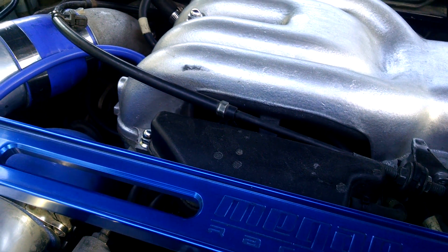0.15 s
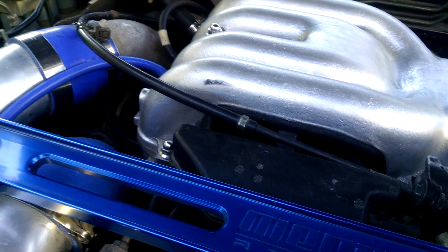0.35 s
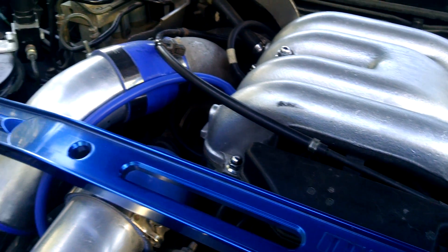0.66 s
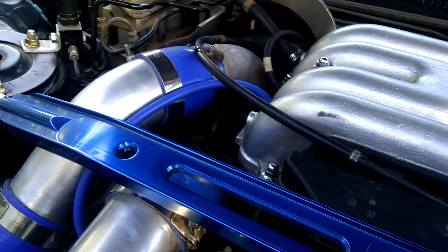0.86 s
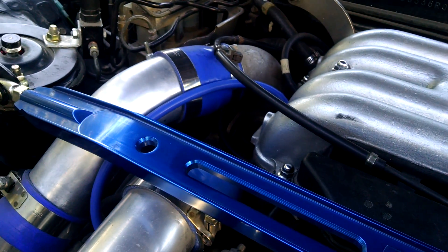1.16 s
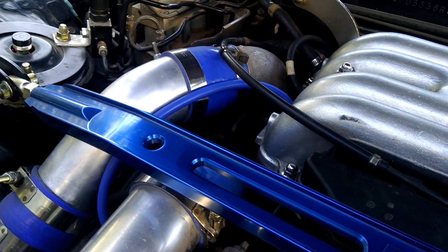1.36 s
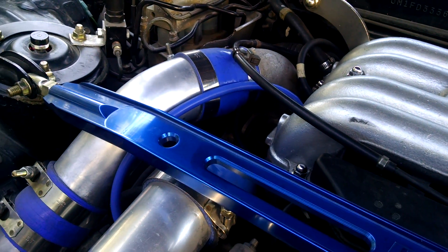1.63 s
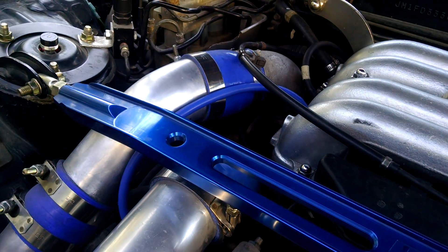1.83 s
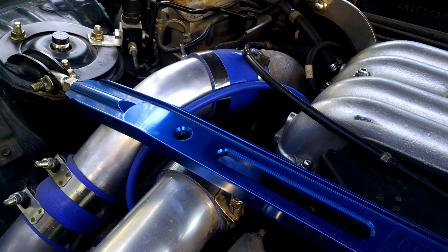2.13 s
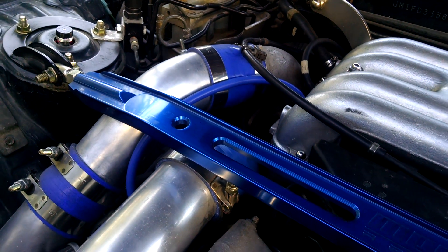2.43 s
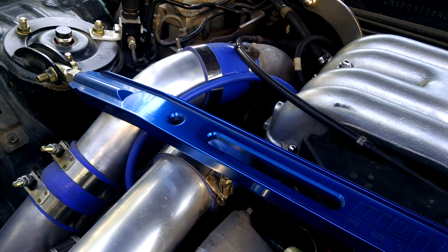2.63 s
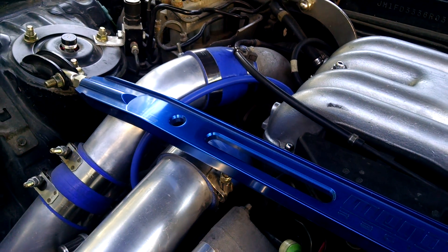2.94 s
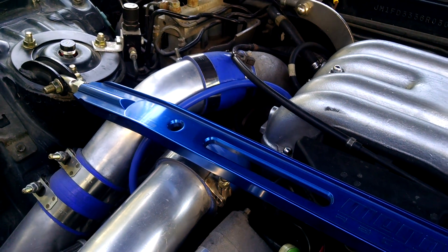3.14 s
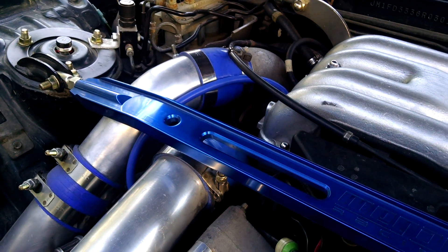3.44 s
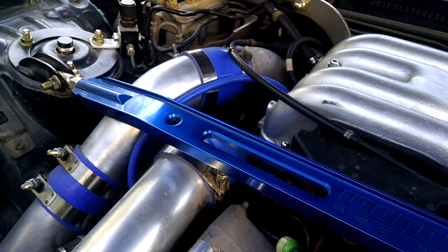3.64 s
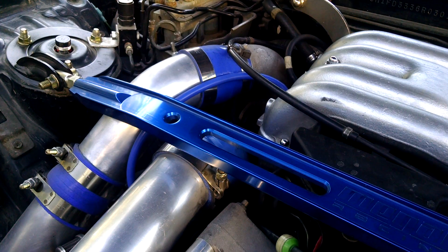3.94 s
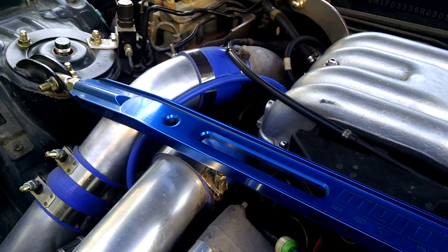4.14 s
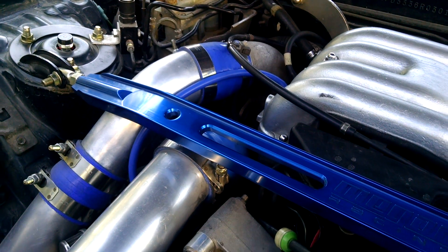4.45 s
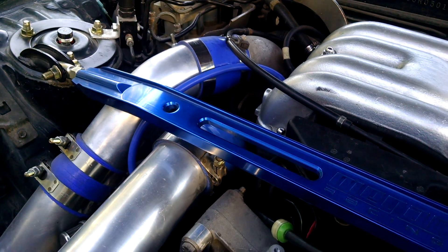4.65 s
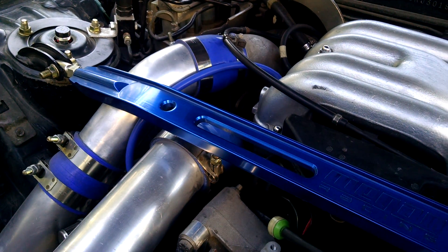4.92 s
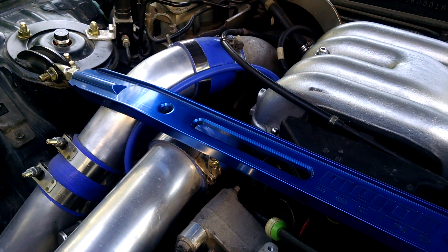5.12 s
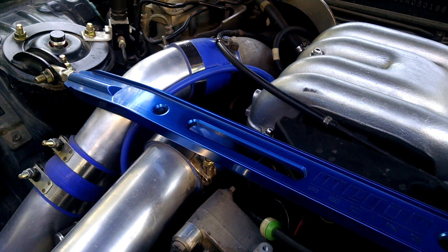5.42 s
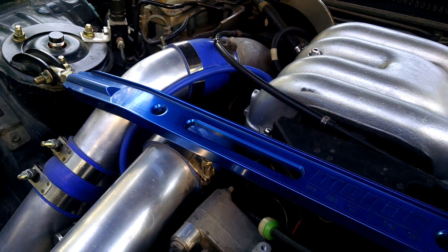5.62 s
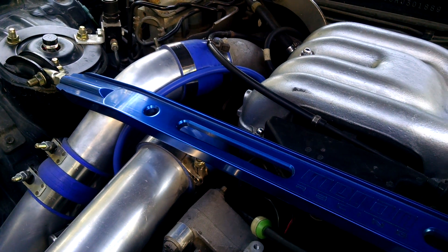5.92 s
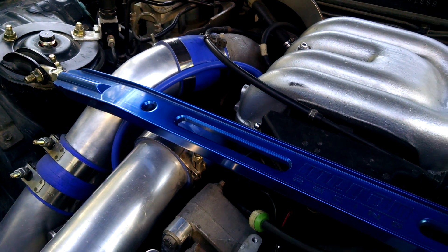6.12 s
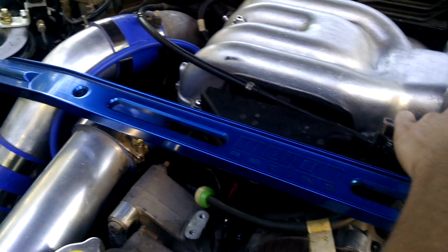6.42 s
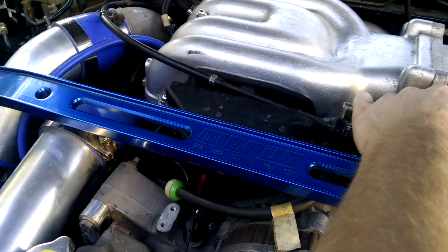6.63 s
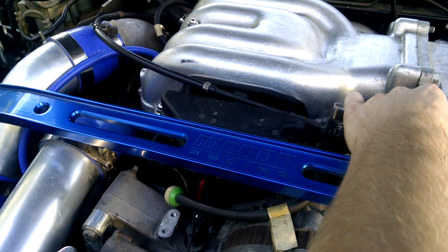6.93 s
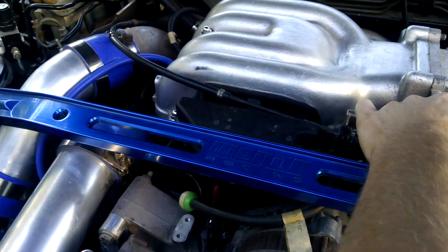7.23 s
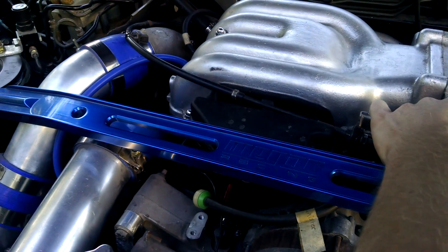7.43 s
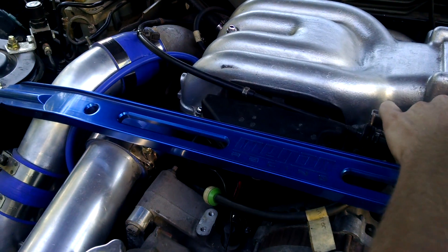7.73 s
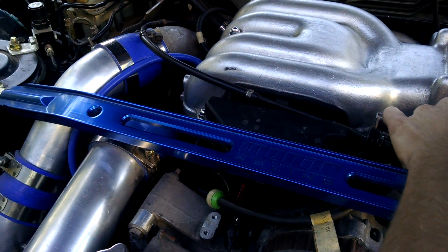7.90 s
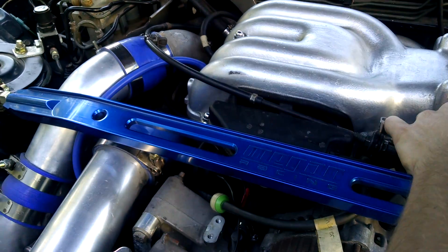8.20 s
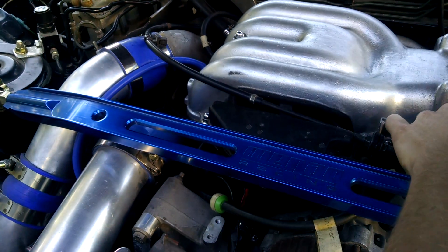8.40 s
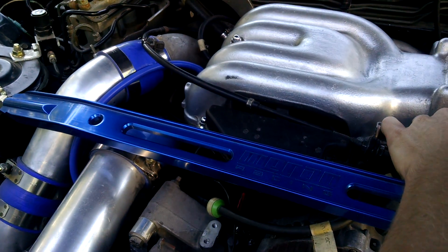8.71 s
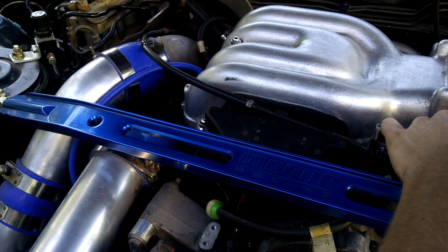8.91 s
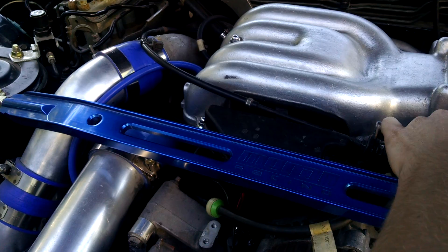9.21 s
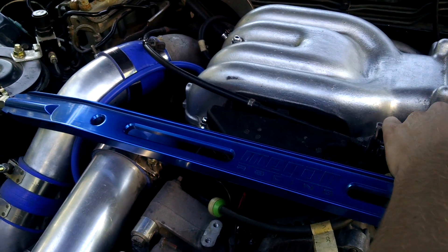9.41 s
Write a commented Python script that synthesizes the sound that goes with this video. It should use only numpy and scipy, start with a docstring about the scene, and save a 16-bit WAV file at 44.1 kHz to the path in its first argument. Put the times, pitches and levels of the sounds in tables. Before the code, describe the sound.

Heard very close under an open hood, a twin-rotor engine is already running. From 0 to 3 seconds it holds a fast idle, rising slightly at first: rapid even firing, low exhaust boom, nasal intake drone, dry clatter, spinning hiss and thin belt and gear whine. A narrow airy whistle catches at times. Around 3.1 the throttle eases and pitch sags in uneven steps until about 4, with dull misfire thumps. It recovers to a gentle drone by 4.8, then climbs from 5.5 to a moderate peak near 6.4, whine and whistle rising. The throttle shuts around 6.5; the pitch tumbles to a deep, lumpy putter by 7.5, with brief booming catches and soft thuds. It stays low until 8.2, revs smoothly to about 9.1, then drops roughly, still running at 9.5. Brighter sounds lean right; faint low air buffeting lies underneath.

```python
"""Under an open hood, a twin-rotor engine holds a fast idle, then rises and falls as a hand works the throttle.
Its rotors fire in turn: pulse trains boom through an exhaust duct, drone in the intake and knock the housings.
A shut throttle scatters the firings into a lumpy putter; misfires thump in the exhaust.
Shaft-locked noise and sines make the clatter, hiss and gear whine; narrow noise bands make the air whistle.
A close stereo pickup with comb-like cancellations listens."""
import sys
import numpy as np
from scipy import signal
from scipy.fft import rfft, irfft, next_fast_len
from scipy.io import wavfile
from scipy.ndimage import uniform_filter1d, map_coordinates

SR = 44100
rng = np.random.default_rng(int(sys.argv[2]) if len(sys.argv) > 2 else 0)


def store_wav(level_fs):
    """Save 16-bit WAV to argv[1]."""
    pcm = np.round(np.clip(np.atleast_2d(level_fs), -1, 1) * 32767)
    wavfile.write(sys.argv[1], SR, pcm.T.astype(np.int16))


N = 421596


def amp(db):
    """Decibels to gain."""
    return 10 ** (np.asarray(db) / 20)


def unit(x):
    """Scale to rms 1."""
    return x / np.sqrt(np.mean(x ** 2) + 1e-20)


def along(points, hz):
    """Interpolate (frequency [Hz], value) points on a log frequency axis."""
    f, v = np.transpose(points)
    return np.interp(np.log(hz + 1), np.log(f + 1), v)


def curves(rows):
    """One value per sample for each column after the time."""
    s, *cols = np.transpose(rows)
    return [np.interp(np.arange(N) / SR, s, c) for c in cols]


def wobble(rate_hz, order=12):
    """Smooth random curve: rate_hz knots a second, order spline points per knot."""
    knots = rng.standard_normal(int(N * rate_hz / SR) + 4)
    grid = np.arange((len(knots) - 1) * order) / order
    return np.interp(np.arange(N) * rate_hz / SR, grid, map_coordinates(knots, [grid]))


def gate(start_s, end_s, rise_s, fall_s):
    """Rise, hold at 1 and fall, each ramp centred on its time."""
    t = np.arange(N) / SR
    return np.clip(np.minimum((t - start_s) / rise_s, (end_s - t) / fall_s) + .5, 0, 1)


def filtered(x, response):
    """Multiply the spectrum of x by a response of frequency."""
    m = next_fast_len(N + SR // 2)
    return irfft(rfft(x, m) * response(np.fft.rfftfreq(m, 1 / SR)), m)[..., :N]


def resonance(hz, centre_hz, width_hz):
    """Response of one damped mode, 1 at its centre."""
    return 1j * hz * width_hz / (centre_hz ** 2 - hz ** 2 + 1j * hz * width_hz)


def duct(x, colour, size=16384):
    """Ring x causally through a minimum-phase duct of the given colour."""
    cepstrum = irfft(np.log(amp(along(colour, np.fft.rfftfreq(size, 1 / SR)))))
    cepstrum[1:size // 2] *= 2
    cepstrum[size // 2 + 1:] = 0
    impulse_response = irfft(np.exp(rfft(cepstrum)))[:size // 2]
    return signal.fftconvolve(x, impulse_response)[:N]


def steady(x, size=3000):
    """Hold the running rms near 1."""
    power = uniform_filter1d(uniform_filter1d(x ** 2, size), size)
    return x / np.sqrt(np.abs(power) + 1e-14)


def from_right(x, lag_s):
    """Sound from the right reaches the left port lag_s later than the right."""
    return filtered(x, lambda hz: np.exp(1j * np.pi * lag_s * np.outer([-1, 1], hz)))


# correlation of the two ports: (frequency [Hz], correlation [-1 to 1])
PORT_CORRELATION = [(30, -0.5), (70, 0), (300, 0.5), (1000, 0.64), (1700, -0.5), (2300, -0.65),
                    (3200, -0.5), (5200, -0.2), (6500, 0), (9000, 0.2), (15000, 0.2)]


def rush(colour, pair=None):
    """Two noises (white unless given), coloured and blended into the two ports at rms 1."""
    def response(hz):
        turn = np.arccos(np.clip(along(PORT_CORRELATION, hz), -1, 1)) / 2
        return amp(along(colour, hz)) * [np.cos(turn), np.sin(turn)]
    noises = rng.standard_normal((2, N)) if pair is None else pair
    mid, side = filtered(noises, response)
    return unit(np.array([mid + side, mid - side]))


# eccentric shaft: (time [s], speed [turns/s])
SHAFT_SPEED = [(0, 30.1), (.3, 31.4), (.6, 32.2), (1.3, 33), (1.8, 32.9), (2, 32.55), (3.12, 32.55),
               (3.3, 30.2), (3.39, 27.8), (3.5, 28.8), (3.62, 25.2), (3.8, 25.1), (3.95, 23.2),
               (4.08, 23.1), (4.3, 25.1), (4.68, 28), (4.88, 28.6), (5.1, 28.15), (5.45, 28.3), (5.7, 30.4),
               (6.15, 37), (6.42, 39.5), (6.58, 38.5), (6.7, 35.8), (6.92, 29.3), (7.1, 26.6), (7.2, 23.3),
               (7.3, 21.5), (7.4, 23.1), (7.52, 20.6), (7.7, 20.6), (7.8, 19.8), (8.1, 20.2), (8.27, 21.5),
               (8.75, 31.3), (9.11, 34.1), (9.3, 30.8), (9.5, 25.9), (9.56, 25.6)]
# throttle closings: (start [s], end [s], closure [0-1])
THROTTLE_LIFTS = [(3.154, 4.004, 0.32), (6.527, 7.32, 1), (9.14, 9.7, 0.93)]
# coasting engine catches and booms: (start [s], end [s], exhaust gain [dB])
SURGES = [(3.33, 3.415, 3), (3.52, 3.63, 5), (3.75, 3.825, 0.5), (6.85, 6.98, 6.5), (7.17, 7.29, 2.5),
          (9.325, 9.477, 8)]
FLYWHEEL_S = .07  # the flywheel rounds off changes of speed
FULL_PULL_TURNS_S2 = 19  # acceleration under full throttle
CLOSE_S, OPEN_S = .12, .3  # travel of the throttle plate
SURGE_EDGE_S = 0.0067
LUG_TURNS_S = 39  # below this the firing grows ragged
# scatter of firing strength: running well, added by shut throttle, added per turn/s of lugging
CALM_SCATTER, SHUT_SCATTER, LUG_SCATTER = .07, .55, .018
SURGE_STEADIES = .75  # share of the stumbling that stops while the engine catches


def drive():
    """Engine state: shaft speed and angle, pull (from acceleration), throttle closure and stumble."""
    speed = uniform_filter1d(curves(SHAFT_SPEED)[0], int(FLYWHEEL_S * SR), mode="nearest")
    shut = sum(depth * gate(start, end, CLOSE_S, OPEN_S) for start, end, depth in THROTTLE_LIFTS)
    acceleration = np.gradient(speed) * SR
    pull = np.clip(acceleration / FULL_PULL_TURNS_S2, 0, 1) * np.clip(1 - 2 * shut, 0, 1)
    catching = sum(gate(start, end, SURGE_EDGE_S, SURGE_EDGE_S) for start, end, _ in SURGES)
    lugging = np.maximum(LUG_TURNS_S - speed, 0) * (1 - pull)
    stumble = CALM_SCATTER + SHUT_SCATTER * shut + LUG_SCATTER * lugging
    stumble = stumble * (1 - SURGE_STEADIES * catching)
    return dict(speed=speed, turns=np.cumsum(speed) / SR, pull=pull, shut=shut, stumble=stumble)


IDLE_TURNS_S = 32.5  # held fast idle


def level(engine, idle_db, octave_db=0, pull_db=0, shut_db=0):
    """Layer level in dB: value at fast idle, plus changes per doubling of speed, by pull and by closure."""
    octaves = np.log2(engine["speed"] / IDLE_TURNS_S)
    return idle_db + octave_db * octaves + pull_db * engine["pull"] + shut_db * engine["shut"]


def throb(turns, once, twice):
    """Gain swelling once a turn and once a firing."""
    return 1 + once * np.cos(2 * np.pi * turns) + twice * np.cos(2 * np.pi * 2 * turns)


def firings(engine, imbalance, scatter, jitter_s, skew_s=0):
    """Two pulses a turn, one rotor stronger and skewed early; stumbling scatters size and timing."""
    at = np.flatnonzero(np.diff(np.floor(2 * engine["turns"])))
    chance = rng.standard_normal((len(at), 2))
    rough = engine["stumble"][at]
    rotor = (-1) ** np.arange(len(at))
    strength = 1 + np.broadcast_to(imbalance, N)[at] * rotor + scatter * rough * chance[:, 0]
    late_s = jitter_s * rough * chance[:, 1] - skew_s * rotor
    return np.bincount(np.clip(at + late_s * SR, 0, N - 1).astype(int), strength, N)


# exhaust colour, throttle open: (frequency [Hz], relative level [dB])
EXHAUST_COLOUR = [(20, -37), (35, -28), (56, -10), (65, -19), (78, -0.5), (95, -1.5), (113, 3), (133, -1.5),
                  (152, -8.5), (172, 1.5), (200, -22), (235, -3), (400, -65)]
# exhaust colour, throttle shut: (frequency [Hz], relative level [dB])
OVERRUN_COLOUR = [(20, -27), (38, -21), (55, -5), (75, -5), (105, 5), (130, -5.5), (170, -7), (220, -16),
                  (400, -43)]
# intake colour: (frequency [Hz], relative level [dB])
INTAKE_COLOUR = [(120, -59), (195, -21.5), (228, -8), (262, -1.5), (292, 8.5), (325, 9.5), (342, 4.5),
                 (362, -11.5), (420, -11.5), (520, -13), (800, -35), (1500, -73)]
# exhaust tuning: (shaft speed [turns/s], level [dB])
EXHAUST_TUNING = [(20, -30.5), (24, -32), (28, -28), (32.5, -33), (37, -39), (40, -41)]
# intake tuning: (shaft speed [turns/s], level [dB])
INTAKE_TUNING = [(20, -29.5), (23, -27), (26.5, -23), (28.3, -24.5), (31, -23), (33, -23), (36, -24),
                 (40, -24.5)]
EXHAUST_PULL_DB, OVERRUN_DB = 4.5, -32  # gain at full pull; level with the throttle shut
LUMP_DB = 1  # random swing of both levels with the throttle shut
SURGE_STEALS = 2.4  # dB the intake loses per dB of surge
ROTOR_IMBALANCE, PULL_IMBALANCE = 0.13, 0.042  # in the intake: base; added at full pull
RUNNER_SKEW_S = 0.00027  # unequal intake runners: one rotor this early, the other this late


def combustion(engine):
    """Firings boom in the exhaust and drone in the intake; a shut throttle gives a deep, lumpy putter."""
    surge_db = sum(db * gate(start, end, SURGE_EDGE_S, SURGE_EDGE_S) for start, end, db in SURGES)
    speed, pull = engine["speed"], engine["pull"]
    shut = np.clip(engine["shut"], 0, 1)

    def lumps_db():
        """Random level swing, in proportion to closure."""
        return LUMP_DB * shut * wobble(22)

    open_db = np.interp(speed, *np.transpose(EXHAUST_TUNING)) + EXHAUST_PULL_DB * pull
    exhaust_db = (1 - shut) * open_db + shut * OVERRUN_DB + surge_db
    blows = firings(engine, imbalance=.09, scatter=.5, jitter_s=.0005)
    boom = steady(duct(blows * (1 - shut), EXHAUST_COLOUR) + duct(blows * shut, OVERRUN_COLOUR))

    intake_db = np.interp(speed, *np.transpose(INTAKE_TUNING)) - SURGE_STEALS * surge_db
    intake_db = intake_db + level(engine, idle_db=-0.5, pull_db=1, shut_db=-10.0)
    imbalance = ROTOR_IMBALANCE + PULL_IMBALANCE * pull
    gulps = firings(engine, imbalance, scatter=.6, jitter_s=.0005, skew_s=RUNNER_SKEW_S)
    drone = steady(duct(gulps, INTAKE_COLOUR))
    both = amp(exhaust_db + lumps_db()) * boom + amp(intake_db + lumps_db()) * drone
    return from_right(both, lag_s=0.00028)


# rotor housings' ring: (frequency [Hz], relative level [dB])
HOUSING_COLOUR = [(350, -26), (460, 1), (560, -6), (720, -19), (900, -2.5), (1050, 14), (1250, -10),
                  (1500, -6), (1750, -5), (2300, -21), (3000, -25)]


def housing(engine):
    """Each firing knocks the housings: a rasp that grows louder when the engine pulls."""
    knocks = firings(engine, imbalance=.3, scatter=1, jitter_s=.0004)
    rasp_db = level(engine, idle_db=-37.0, octave_db=2, pull_db=3.0, shut_db=-6.0)
    return from_right(amp(rasp_db) * steady(duct(knocks, HOUSING_COLOUR)), lag_s=.00028)


# drive clatter colour: (frequency [Hz], relative level [dB])
CLATTER_COLOUR = [(25, -8), (60, -14), (120, 1.5), (200, -1), (310, 2.5), (440, 2), (520, -5), (620, -0.5),
                  (720, 0), (880, -4), (1080, -1.5), (1550, -2.5), (2000, -2.5), (6000, -22.5)]


def machinery(turns, count=46):
    """Clatter locked to the turn: a comb of shaft orders, each drifting in strength and sign."""
    orders = np.arange(12, count)
    phases = rng.uniform(0, 2 * np.pi, len(orders))
    angle = 2 * np.pi * (turns % 1)
    drift = rng.normal(1, 1.0, (len(orders), 60))
    moment = np.linspace(0, drift.shape[1] - 1, N)
    comb = np.zeros(N)
    for order, phase, knots in zip(orders, phases, drift):
        comb += np.interp(moment, np.arange(len(knots)), knots) * np.sin(order * angle + phase)
    return unit(filtered(comb, lambda hz: amp(along(CLATTER_COLOUR, hz))))


# grain of spinning bearings and belts: (multiple of shaft speed [-], relative level [dB])
SPIN_GRAIN = [(200, 1), (365, 1.3), (385, -1), (430, 1.5), (535, -1.5), (595, -6), (655, -6.3), (780, -11),
              (810, -60)]


def spun(turns, size=2048):
    """Surface grain read out by the shaft, size samples a turn: its colour glides with speed."""
    m = next_fast_len(int(turns[-1] + 2) * size)
    colour = amp(along(SPIN_GRAIN, np.fft.rfftfreq(m, 1 / size)))
    grains = irfft(rfft(rng.standard_normal((2, m))) * colour, m)
    return np.array([map_coordinates(grain, [turns * size]) for grain in grains])


# air rush colour: (frequency [Hz], relative level [dB])
AIR_COLOUR = [(800, -6.5), (1800, 0), (2400, -5.5), (3700, 7.5), (4800, 1), (6300, -0.5), (7500, -7),
              (8200, -11.5), (9300, -3.5), (11000, -23), (15000, -24)]
# spinning hiss colour: (frequency [Hz], relative level [dB])
HISS_COLOUR = [(5500, -24), (6900, -1), (7300, -1), (7750, -2.5), (8450, -2.5), (9350, 6), (9600, 0),
               (9850, 3.5), (10900, 1), (11350, -0.5), (11850, 4), (13200, -0.5), (15300, -1)]


def bay(engine):
    """Clatter of the drive, air drawn in gulps and hiss of spinning parts, all in step with the shaft."""
    turns = engine["turns"]
    clatter_db = level(engine, idle_db=-26.5, octave_db=-1.0, pull_db=0.8, shut_db=0.0)
    locked_db = clatter_db + level(engine, idle_db=-7.0, pull_db=3.0, shut_db=-0.5)
    air_db = level(engine, idle_db=-24.0, octave_db=3.5, pull_db=1.0, shut_db=0.5)
    hiss_db = level(engine, idle_db=-24.0, octave_db=2.0, pull_db=-0.5, shut_db=-0.5)
    clatter = amp(clatter_db + 1.1 * wobble(25)) * throb(turns, once=.08, twice=.15) * rush(CLATTER_COLOUR)
    locked = amp(locked_db) * machinery(turns)
    air = amp(air_db + 1.05 * wobble(18)) * throb(turns, once=0.058, twice=0.015) * rush(AIR_COLOUR)
    hiss = rush(HISS_COLOUR, spun(turns))
    hiss = amp(hiss_db + 0.58 * wobble(19)) * throb(turns, once=.12, twice=0.24) * hiss
    return clatter + locked + air + from_right(hiss, lag_s=0.0002776)


# throttle-plate whistle: (centre [Hz], width [Hz], relative level [dB])
WHISTLE_MODES = [(8620, 77, 16), (8820, 54, 11.5)]


def whistle(engine):
    """Air past the throttle plate sings in narrow, breathy resonances, louder with speed."""
    def modes(hz):
        return sum(amp(db) * resonance(hz, centre, width) for centre, width, db in WHISTLE_MODES)
    tone = unit(filtered(rng.standard_normal((2, N)), modes))
    whistle_db = level(engine, idle_db=-34.5, octave_db=3, pull_db=2.5)
    return amp(whistle_db) * throb(engine["turns"], once=0.04, twice=0.033) * tone


# alternator case modes: (whine frequency [Hz], level [dB])
ALTERNATOR_MODES = [(1900, -40), (2100, -36), (2250, -30), (2360, -28), (2460, -33), (2600, -39),
                    (2750, -36), (2950, -31.5)]
# pulleys and gears: (multiple of shaft speed [-])
GEAR_ORDERS = [26.7, 34, 36.3, 39.9, 44.6, 48.1, 53.4]
# their strengths at fast idle, before the common gear level: (level [dB])
GEAR_DB = [-37.5, -47, -39.5, -44, -42.5, -43.5, -43.5]


def accessories(engine):
    """Alternator, pulleys and gears whine at high shaft multiples, wavering with belt slip."""
    alternator_order, pump_order = 80.25, 33.2
    turns = engine["turns"]
    slip_rad = (.55 + .9 * engine["stumble"]) * wobble(90)
    flutter = amp(2.8 * wobble(45)) * throb(turns, once=.2, twice=.35)
    angle = 2 * np.pi * alternator_order * turns + np.array([[0], [1.9]])  # phase per port
    # the case rings as the whine sweeps through its modes
    alternator_db = along(ALTERNATOR_MODES, alternator_order * engine["speed"])
    alternator = amp(alternator_db) * flutter * np.sin(angle + slip_rad)

    gears = np.zeros(N)
    for order, db in zip(GEAR_ORDERS, GEAR_DB):
        gears += amp(db + 2.5 * wobble(6)) * np.sin(2 * np.pi * order * turns + wobble(45))
    gears_db = level(engine, idle_db=-1.5, octave_db=5.0, shut_db=-4.5)

    # a bracket rings as the pump's rasp sweeps through its resonance
    rasp = throb(turns, once=.6, twice=.25) * np.sin(2 * np.pi * pump_order * turns + .7 * wobble(60))
    bracket = filtered(rasp, lambda hz: resonance(hz, centre_hz=770, width_hz=150) ** 2)
    bracket_db = level(engine, idle_db=-29.5, pull_db=-1.0, shut_db=-6.0)
    return alternator + amp(gears_db) * gears + amp(bracket_db) * bracket


# low rumble colour: (frequency [Hz], relative level [dB])
RUMBLE_COLOUR = [(15, 0), (35, -3), (70, -5), (200, -49)]


def rumble():
    """Faint low rumble in the ports: low noise of drifting level."""
    return amp(-46 + 3.4 * wobble(2.8)) * rush(RUMBLE_COLOUR)


# level swells and dips: (start [s], end [s], gain [dB])
SWELLS = [(-.1, 0.117, -0.5), (1.244, 1.378, -2), (3.83, 4.006, -0.5), (4.07, 4.322, 1.5),
          (5.23, 5.56, -1.5), (5.89, 6.03, -1.5), (6.703, 6.838, -1), (8.255, 8.456, -1)]


def swell():
    """Gain that briefly lifts or lowers the engine's level."""
    edge_s = 0.024
    return amp(sum(db * gate(start, end, edge_s, edge_s) for start, end, db in SWELLS))


# sizzle bands: (multiple of shaft speed [-])
BEARING_ORDERS = [301, 309, 340, 388, 430, 456]
# their strengths: (level [dB])
BEARING_DB = [-35, -32, -33, -36, -36, -49]


def bearings(engine):
    """Narrow bands of bearing sizzle glide with the shaft and fade away during the held fast idle."""
    bands = np.zeros(N)
    for order, db in zip(BEARING_ORDERS, BEARING_DB):
        bands += amp(db) * wobble(400) * np.sin(2 * np.pi * order * engine["turns"])
    return bands * gate(start_s=0.44, end_s=2.8, rise_s=.8, fall_s=.5)


# held notes: (start [s], end [s], centre [Hz], width [Hz], level [dB])
HELD_NOTES = [(.75, 1.9, 7970, 36, -35), (4.08, 4.65, 7210, 170, -35), (5.6, 6.65, 8840, 54, -34.5)]


def held_notes():
    """Now and then a thin note holds on one pitch: noise through one narrow resonance."""
    def note(centre_hz, width_hz):
        return unit(filtered(rng.standard_normal(N), lambda hz: resonance(hz, centre_hz, width_hz)))
    return sum(amp(db) * gate(start, end, rise_s=0.12, fall_s=.15) * note(centre, width)
               for start, end, centre, width, db in HELD_NOTES)


# misfire pops: (time [s], kick level [dB])
POPS = [(1.908, -18), (2.719, -19), (2.769, -31), (3.196, -17), (3.345, -20), (3.52, -22), (3.753, -18),
        (4.006, -20), (6.477, -19), (6.518, -27), (6.579, -25), (6.635, -23), (6.689, -21), (6.97, -28),
        (7.023, -21), (7.077, -21.5), (7.116, -21), (7.176, -18), (7.197, -17), (7.332, -26), (7.464, -19),
        (7.511, -17), (9.142, -18), (9.173, -32), (9.219, -20), (9.251, -30)]


def misfires(engine):
    """Unburnt mixture lights in the exhaust with a dull thump, on the nearest firing."""
    ports = np.flatnonzero(np.diff(np.floor(2 * engine["turns"])))
    kicks = np.zeros(N)
    for s, db in POPS:
        kicks[ports[np.argmin(np.abs(ports - s * SR))]] = amp(db)
    # duct colour: (frequency [Hz], relative level [dB])
    thump = duct(kicks, [(20, -3), (55, 3), (100, 13.0), (170, -14), (320, 0), (900, -62)])
    return thump * kicks.max() / np.abs(thump).max()


def scene():
    """Engine layers follow the shaft and throttle; misfires and low rumble bypass the swells."""
    engine = drive()
    firing = combustion(engine) + housing(engine)
    treble = from_right(whistle(engine) + held_notes() + bearings(engine), lag_s=0.000323)
    running = firing + bay(engine) + treble + accessories(engine)
    return swell() * running + misfires(engine) + rumble()


# port balance: (frequency [Hz], left minus right [dB])
PORT_LEAN = [(100, -0.5), (330, -0.5), (650, -4.5), (1300, -3), (2600, -1), (4000, -3), (5200, -1.5),
             (7000, -5), (8700, -8.5), (10000, -11.5), (15000, -10.5)]
# cancellations in the sum: (centre [Hz], width [Hz], depth [dB])
MID_DIPS = [(2609, 216, 47.5), (2730, 330, 1.5), (5172, 395, 17)]
# cancellations in the difference: (centre [Hz], width [Hz], depth [dB])
SIDE_DIPS = [(1420, 490, 13.8), (3895, 430, 30), (6140, 340, 6.9)]
DIP_STEEPNESS = 3  # exponent of the dip edges
TOP_HZ = 15550


def record(dry):
    """Pickup: leans right in the treble, cancels narrow bands in sum and difference, is band-limited."""
    def dips(rows, hz):
        return amp(-sum(db * np.exp(-np.abs((hz - centre) / width) ** DIP_STEEPNESS)
                        for centre, width, db in rows))
    left, right = filtered(dry, lambda hz: amp(np.outer([.5, -.5], along(PORT_LEAN, hz))))
    mid = filtered((left + right) / 2, lambda hz: dips(MID_DIPS, hz))
    side = filtered((left - right) / 2, lambda hz: dips(SIDE_DIPS, hz))
    return filtered(np.array([mid + side, mid - side]), lambda hz: hz < TOP_HZ)


dry = scene()
out = record(dry)
store_wav(out)
```